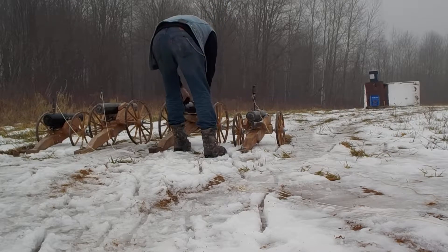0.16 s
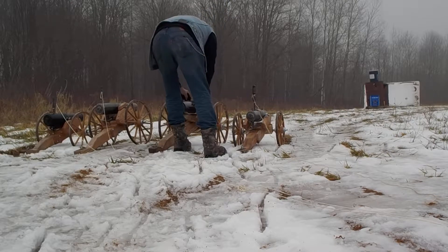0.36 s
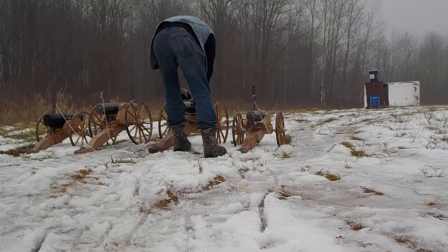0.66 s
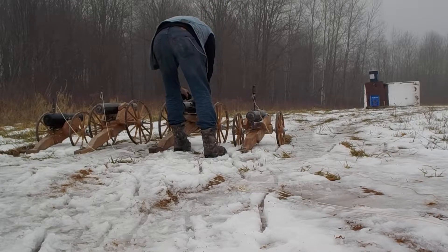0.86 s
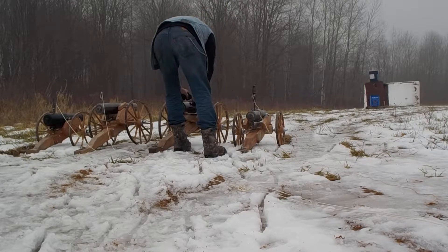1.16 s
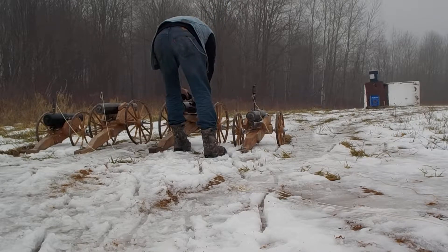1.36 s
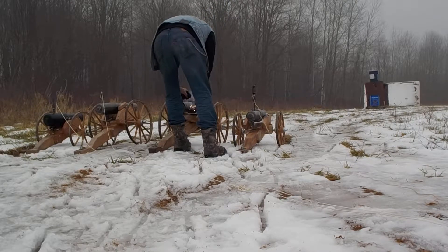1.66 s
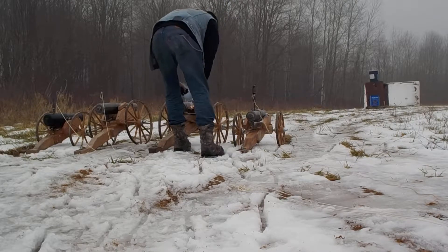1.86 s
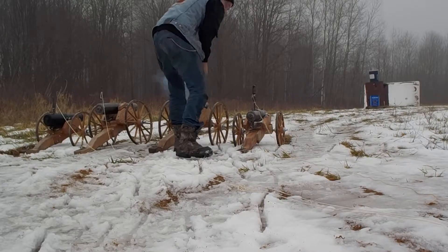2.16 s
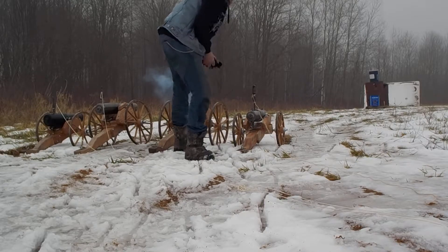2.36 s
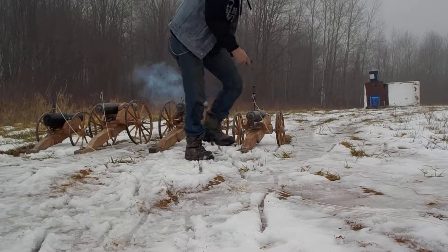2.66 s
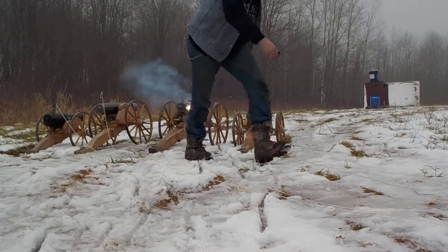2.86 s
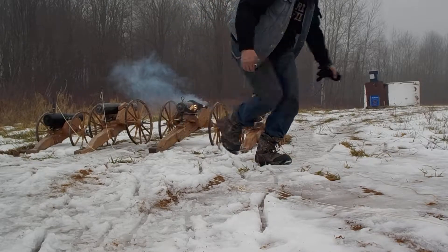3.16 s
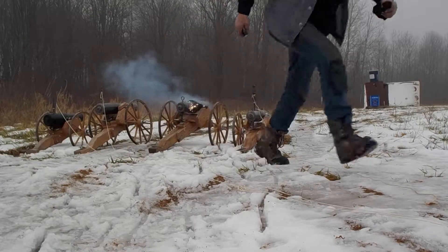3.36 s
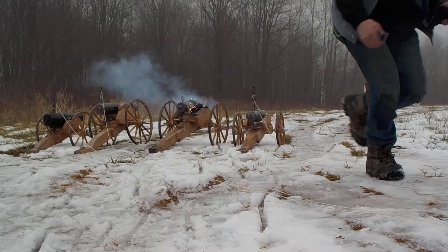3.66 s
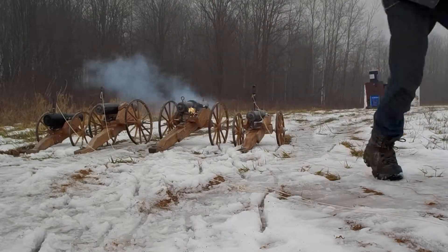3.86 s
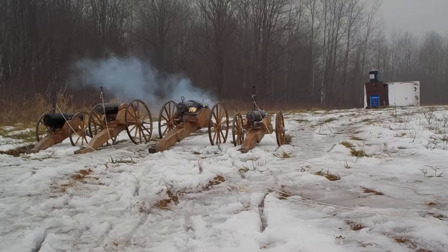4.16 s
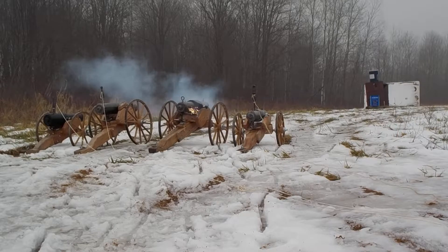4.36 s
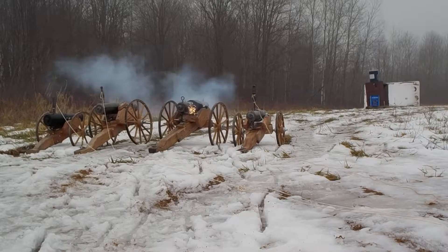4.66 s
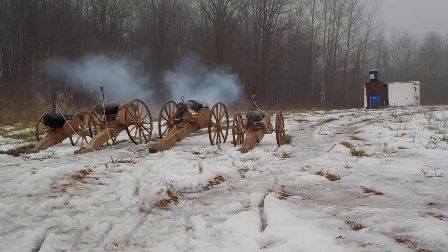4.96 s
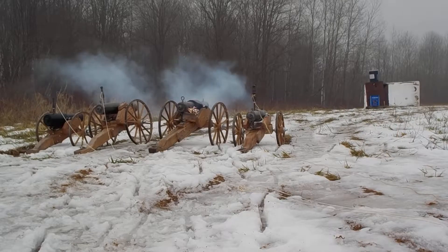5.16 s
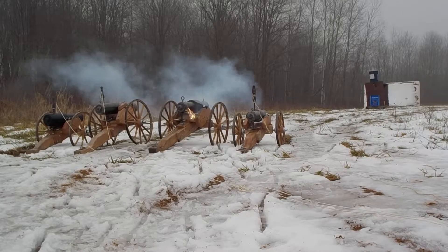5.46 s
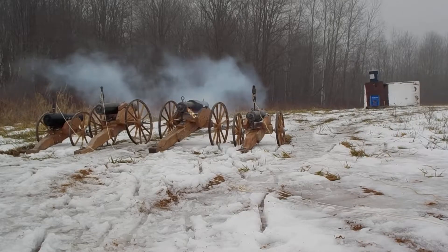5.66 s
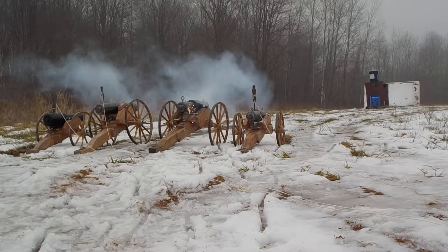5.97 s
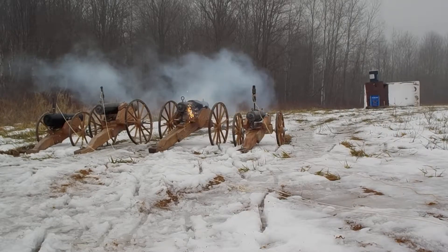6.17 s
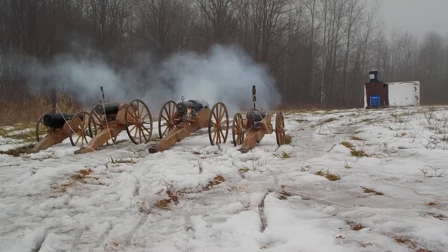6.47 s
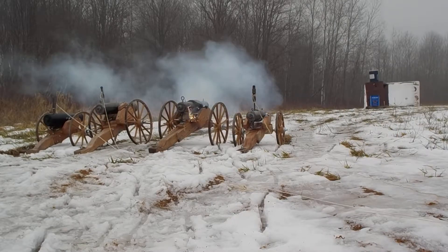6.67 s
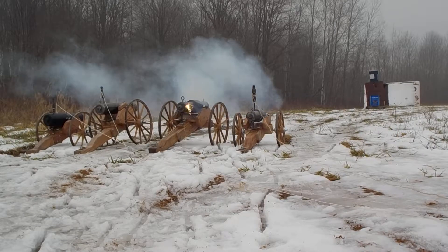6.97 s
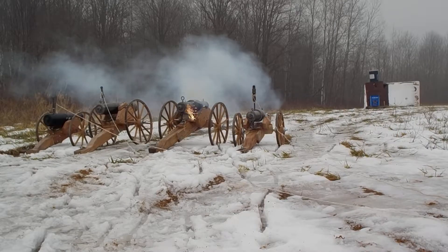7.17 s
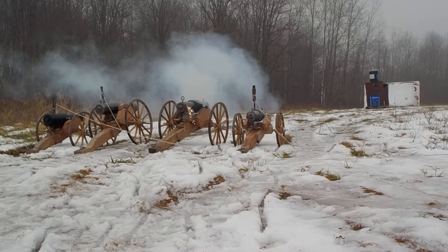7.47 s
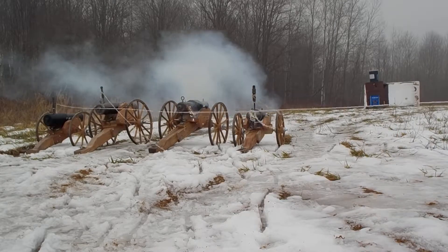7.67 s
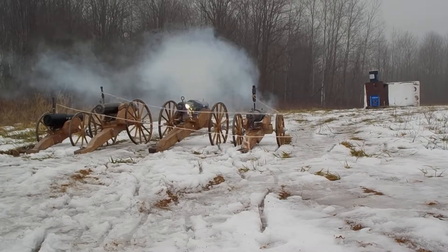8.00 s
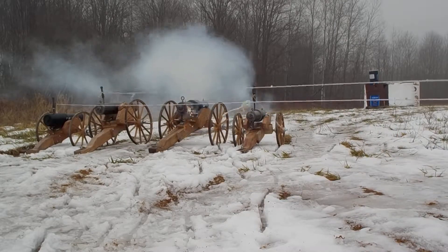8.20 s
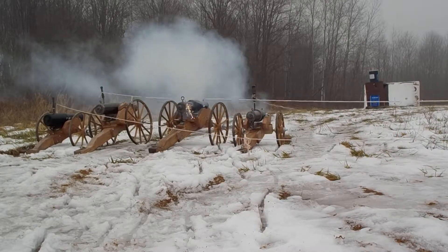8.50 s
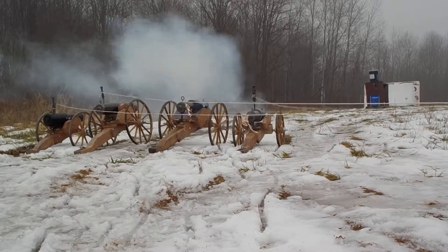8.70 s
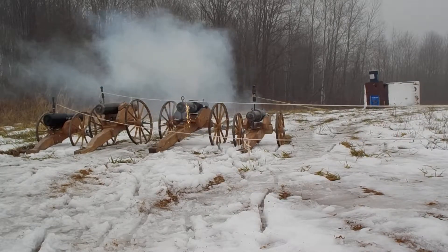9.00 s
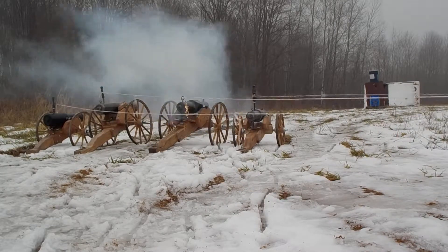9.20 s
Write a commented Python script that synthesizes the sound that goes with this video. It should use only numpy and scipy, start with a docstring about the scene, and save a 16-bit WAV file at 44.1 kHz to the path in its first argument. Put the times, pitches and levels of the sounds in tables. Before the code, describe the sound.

In an open snowy field, a faint distant dog yelps over soft camera hiss. Around two seconds a cannon fuse catches, spitting and crackling with sharp dry pops. Boots crunch quickly through icy crust, nearer and to the right, while the fuse keeps hissing, flaring and snapping irregularly until the end. A small camera hears it with a slightly hollow, filtered tone; no blast follows.

```python
"""Lit fuse in a snowy field

A fuse hisses, spits and pops among small wooden gun carriages: shaped noise for the gas jet, ringing
pressure spikes with bounces and diffuse echoes for the pops. Boots crunch through the crust on the right
as noise grains and short tones, and a dog yelps far off in arched harmonics. A small camera hears it over
steady hiss through a housing that cuts notches in the sound, with a faint tick of pulses inside it."""
import sys
import numpy as np
from scipy import signal
from scipy.fft import rfft, irfft, next_fast_len
from scipy.io import wavfile
from scipy.ndimage import uniform_filter1d

SR = 44100
rng = np.random.default_rng(int(sys.argv[2]) if len(sys.argv) > 2 else 0)


def generate_wav(sig):
    """Save sig (samples, or channels by samples) to the path in sys.argv[1] as 16-bit PCM at SR."""
    pcm = np.round(np.clip(np.atleast_2d(sig).T, -1, 1) * 32767).astype(np.int16)
    wavfile.write(sys.argv[1], SR, pcm)


N = 411894  # length [samples]


def gain_of(db):
    """Level law: amplitude ratio = 10^(dB / 20)."""
    return 10 ** (np.asarray(db) / 20)


def evened(x):
    """Power normalisation: scales to rms 1 over all channels together."""
    return x / np.sqrt(np.mean(x ** 2) + 1e-20)


def read(points, hz):
    """Logarithmic frequency scale: interpolates (frequency [Hz], value) rows along it."""
    f, value = np.transpose(points)
    return np.interp(np.log(hz + 1), np.log(f + 1), value)


def along(curve):
    """Amplitude envelope: gain at every sample from (time [s], level [dB]), -120 dB before the first row."""
    s, db = np.transpose(curve)
    return gain_of(np.interp(np.arange(N) / SR, s, db, left=-120))


def add(mix, s, sound):
    """Superposition: adds a sound at time s, cut at the end of the mix."""
    part = mix[:, round(s * SR):][:, :sound.shape[1]]
    part += sound[:, :part.shape[1]]


def ring(x, hz, width):
    """Resonance: a second-order band-pass with gain 1 at its centre."""
    return signal.lfilter(*signal.iirpeak(hz, hz / width, SR), x)


def coloured(x, spectrum):
    """Spectral shaping: multiplies the spectrum by a level curve, then sets rms 1."""
    size = next_fast_len(N)
    gain = gain_of(read(spectrum, np.fft.rfftfreq(size, 1 / SR)))
    return evened(irfft(rfft(x, size) * gain, size)[..., :N])


def grainy(per_s, spread_db, grain_s, wide):
    """Shot noise: random decaying grains over a steady bed of noise that differs partly between the ports."""
    size = gain_of(spread_db * np.minimum(rng.exponential(1, N), 4))  # uneven if spread_db is not 0
    strikes = size * (rng.random(N) < per_s / SR)
    lumps = signal.lfilter([1], [1, -np.exp(-1 / (grain_s * SR))], strikes)
    both, left, right = rng.standard_normal((3, N))
    return (1 + lumps) * (both + wide * np.array([left, right]))


def lagged(x, samples):
    """Interaural-style time difference: delays the left port by whole samples."""
    return np.array([np.roll(x[0], int(round(samples)), axis=-1), x[1]])


def swells(rows):
    """Exponential growth and decay: millisecond-grid gains of (start, hold, dB, rise, fall) rows.

    Rise and fall are times for 20 dB; only their magnitudes count."""
    s, hold, db, rise, fall = np.transpose(rows)[:5, :, None]
    dt = np.arange(0, N / SR + .001, .001) - s
    before, after = -dt / abs(rise), (dt - hold) / abs(fall)
    return gain_of(db - 20 * np.maximum(np.maximum(before, after), 0))


def at_samples(slow):
    """Linear interpolation: from the millisecond grid to samples."""
    return np.interp(np.arange(N) / SR, np.arange(len(slow)) * .001, slow)


# spectrum of air and sensor hiss: (frequency [Hz], level [dB])
FIELD_SPECTRUM = [(30, -4.5), (60, -22.5), (100, -25), (250, -17.5), (500, -7.5), (1000, -1), (1700, -1),
                  (2200, -13), (3000, -22), (4500, -13.5), (7000, -22.5), (10000, -18), (13000, -16),
                  (15600, -16), (15900, -46)]
# left-right correlation of the hiss: (frequency [Hz], likeness [1])
FIELD_LIKENESS = [(60, 0.3), (240, 0.081), (950, 0.825), (3770, 0.704), (15000, 0.32)]
FIELD_DB = -66  # rms


def field():
    """Stationary random noise: complex Gaussian short-time spectra, partly coherent, with faint patches."""
    frames, hz = N // 256 + 5, np.fft.rfftfreq(1024, 1 / SR)
    a, b, c, d, patches = rng.standard_normal((frames, 513, 5)).T
    patches = uniform_filter1d(patches, 12, 0)  # smooth over frequency
    patches = evened(uniform_filter1d(patches, 14, 1))  # and over time
    same = np.clip(read(FIELD_LIKENESS, hz), -1, 1)[:, None]
    left = a + 1j * b
    right = same * left + np.sqrt(1 - same ** 2) * (c + 1j * d)
    level_db = read(FIELD_SPECTRUM, hz)[:, None] + 0.97 * patches
    hiss = signal.istft(np.array([left, right]) * gain_of(level_db), nperseg=1024, noverlap=768)[1]
    return gain_of(FIELD_DB) * evened(hiss[:, :N])


TICK_FIRST_S, TICK_EVERY_S, TICK_WIDE_S = .01545, .0170369, .00011
# peak of the tick, left row and right row: (level [dB])
TICK_PEAKS = [
    [-54.5],
    [-57.5],
]


def ticks():
    """Band-limited impulses: each tick inside the camera is a short pulse heard as two opposite edges."""
    starts = np.arange(TICK_FIRST_S, N / SR - .01, TICK_EVERY_S) * SR
    near = np.round(starts).astype(int)[:, None] + np.arange(-120, 126)
    after = near - starts[:, None]  # samples since the exact start
    soft = 2 * 15600 / SR  # edges limited to 15600 Hz
    edges = np.sinc(soft * after) - 1.27 * np.sinc(soft * (after - TICK_WIDE_S * SR))
    out = np.zeros(N)
    out[near] = edges * np.hanning(near.shape[1])
    out = signal.lfilter([1, -.7], [1], out)  # coupled in with a treble lift
    return gain_of(TICK_PEAKS) * out / out.max()


# far yelps: (time [s], length [s], top of the second harmonic [Hz], level [dB])
YELP_EVENTS = [(0.586, .088, 1090, -66.5), (0.879, 0.106, 1085, -65), (1.163, .112, 1080, -65),
               (1.47, .07, 1150, -72)]
YELP_SAG, YELP_TOP_AT = .17, .52  # pitch arch: share lost at the start, place of the top (0 to 1)
YELP_FADE_DB = -1.5  # over a yelp


def dog():
    """Harmonic series: arched yelps, of which distance leaves the second harmonic and some of the third."""
    out = np.zeros((2, N))
    for s, length, top_hz, db in YELP_EVENTS:
        u = np.arange(0, length, 1 / SR) / length
        arch = 1 - YELP_SAG * ((u - YELP_TOP_AT) / YELP_TOP_AT) ** 2
        phase = np.pi * np.cumsum(top_hz * arch) / SR  # of the fundamental, half the table's pitch
        voice = np.sin(2 * phase) + gain_of(-7.0) * np.sin(3 * phase)
        envelope = gain_of(db + YELP_FADE_DB * u) * signal.windows.tukey(len(u), .4)
        add(out, s, np.sqrt(2) * envelope * voice[None])
    return out


# spectrum of breaking crust: (frequency [Hz], level [dB])
SNOW_SPECTRUM = [(120, -22), (300, -9), (600, -2), (1000, -9.5), (1800, 1.5), (2800, -10), (4200, -12),
                 (7000, -9.5), (10000, -36.5)]
# crust giving way under a boot:
# (time [s], hold [s], level [dB], time to fall 20 dB, sign ignored [s], pitch of the hollow under the sole [Hz])
CRUNCH_EVENTS = [(2.858, 0.22, -60.5, -0.44, 936), (3.401, 0.055, -63.5, -0.06, 940),
                 (3.476, 0.024, -53.5, .13, 943), (3.679, 0.164, -67.5, 0.55, 910),
                 (3.947, 0.0448, -42, 0.0619, 1202), (4.085, 0.034, -61, -0.08, 1180),
                 (4.196, 0.0326, -53.5, -0.02, 1170), (4.318, .004, -39, .012, 1000),
                 (4.363, 0.0767, -41.5, 0.07, 1080), (4.871, .047, -41, 0.0281, 1005),
                 (4.94, 0.0457, -44, 0.0015, 830), (5.01, 0.0425, -55.5, 0.07, 905),
                 (5.113, 0.042, -62, -0.06, 1143), (5.242, 0.0059, -54, 0.0845, 1300),
                 (5.287, 0.0496, -41, -0.0012, 1120), (5.37, 0.0204, -40.5, -0.01, 804),
                 (5.43, 0.033, -62, 0.22, 906), (5.63, 0.0396, -44.5, 0.0635, 958),
                 (5.782, 0.0109, -46.5, -0.03, 1226), (5.81, 0.02395, -42, -0.01, 1163),
                 (5.888, 0.0194, -57.5, 0.15, 950), (6.136, 0.0209, -40, 0.0754, 1332),
                 (6.184, 0.082, -54.5, 0.143, 1334), (6.624, 0.018, -53, 0.18, 810),
                 (7.067, 0.186, -63, 0.37, 930), (7.292, 0.041, -54.5, .11, 867),
                 (7.48, 0.058, -54, 0.06, 894), (7.565, 0.0457, -49.5, 0.06, 1025),
                 (7.681, 0.069, -61, 0.42, 717), (7.758, 0.119, -55.5, 0.31, 766),
                 (8.149, 0.0188, -47, 0.0228, 939), (8.404, .045, -48, .018, 900),
                 (9.108, .05, -67.5, 4.15, 1022)]
CRUNCH_RISE_S = .014  # the crust breaks suddenly: time to rise 20 dB
RIGHT_LAG = 2  # samples by which the left port lags for sound from the right


def boots():
    """Moving resonance: dense grains of breaking crust ring the hollow under the sole, off to the right."""
    crust = coloured(grainy(per_s=450, spread_db=4.0, grain_s=.0012, wide=.1), SNOW_SPECTRUM)
    rows = [(s, hold, db, CRUNCH_RISE_S, fall) for s, hold, db, fall, _ in CRUNCH_EVENTS]
    power = swells(rows) ** 2 + 1e-30
    total = power.sum(axis=0)
    hz = at_samples(np.array(CRUNCH_EVENTS)[:, -1] @ power / total)  # pitch averaged by power
    # shift the pitch to 0 Hz, low-pass to a resonance 300 Hz wide, shift back
    turn, keep = np.exp(2j * np.pi * np.cumsum(hz) / SR), np.exp(-np.pi * 300 / SR)
    hollow = 2 * (turn * signal.lfilter([1 - keep], [1, -keep], crust / turn)).real
    crunch = evened(crust + gain_of(10.5) * hollow)
    return lagged(at_samples(np.sqrt(total)) * crunch, RIGHT_LAG)


# lumps of crust snapping under a boot: (time [s], level before the pulse shape [dB], pitch [Hz])
CLOD_EVENTS = [(3.968, -33, 1410), (4.099, -41.5, 1314), (4.135, -43.5, 1358), (4.377, -42, 1340),
               (4.427, -30.5, 1572), (4.873, -35.5, 576), (4.887, -30, 1404), (4.946, -25.5, 843),
               (4.958, -40, 586), (4.981, -34.5, 747), (5.015, -41, 594), (5.293, -42, 1264),
               (5.325, -27, 1600), (5.373, -30.5, 710), (5.644, -40, 591), (5.783, -35.5, 1686),
               (5.82, -33.5, 995), (6.619, -40.5, 710), (7.488, -45.5, 815), (7.583, -39.5, 910),
               (7.827, -44, 573), (7.868, -34, 600)]


def clods():
    """Damped oscillation: each snapping lump gives a few soft cycles, off to the right."""
    t, out = np.arange(500) / SR, np.zeros((2, N))
    swell = t / 0.00222 * np.exp(1 - t / 0.001452)
    for s, db, hz in CLOD_EVENTS:
        add(out, s, gain_of(db) * swell * np.sin(2 * np.pi * hz * t) * np.ones((2, 1)))
    return lagged(out, RIGHT_LAG)


# steady jet of the fuse: (time [s], level [dB])
BURN_LEVEL = [(1.465, -96), (1.48, -69.5), (1.65, -71.5), (1.67, -67.5), (1.94, -68.5), (2.3, -66.5),
              (2.6, -64.5), (2.85, -62), (3.3, -63), (3.62, -62.5), (3.8, -57.5), (4.6, -57), (4.9, -59),
              (5.2, -59), (6.0, -59), (6.42, -66), (6.75, -56.5), (6.99, -69.5), (7.05, -59), (7.8, -61),
              (8.4, -58), (8.6, -59.5), (9.339, -58.5)]
# spectrum of the jet: (frequency [Hz], level [dB])
JET_SPECTRUM = [(200, -20), (500, -7.5), (900, -8.5), (1600, -8), (3000, -2), (4000, -2.5), (5200, -9),
                (6500, -1.5), (9000, -14), (12000, -30.5), (16000, -45.5)]
# flares of the jet: (time [s], hold [s], level [dB], time to rise 20 dB [s], time to fall 20 dB [s]), signs of
# the last two ignored
FLARE_EVENTS = [(1.95, 0.0136, -51, 0.0215, 0.18), (2.31, 0.038, -60, 0.12, 0.56),
                (3.14, 0.046, -55, 0.32, 0.65), (3.535, 0.0144, -50, 0.0973, -0.0028),
                (3.92, 0.046, -53, 0.45, -0.16), (4.07, 0.01365, -52, -0.1, 0.05),
                (4.27, 0.0874, -53.5, 0.05, 0.35), (4.36, 0.066, -52.5, -0.21, 0.31),
                (4.655, 0.0346, -46.5, 0.06, -0.0047), (5.315, 0.028, -46.5, 0.0737, 0.0225),
                (5.39, 0.044, -56.5, 0.99, 0.06), (5.65, 0.079, -59.5, 0.02, 0.42),
                (6.13, 0.061, -47.5, 0.0336, -0.0226), (6.29, 0.049, -58, 0.31, 0.1746),
                (7.165, 0.0214, -43.5, 0.0469, 0.0588), (7.39, 0.0313, -56, 0.06, 0.31),
                (7.853, 0.012, -54.5, 0.01, 0.17), (8.953, 0.00924, -48.5, 0.0327, 0.11)]
# the jet puffs after a pop, a little more after a loud one: level at a 0 dB pop, then dB per dB
PUFF_DB, PUFF_FOLLOWS = -55, 0.313
PUFF_LATE_S, PUFF_RISE_S, PUFF_FALL_S = 0.0209, 0.0188, 0.0577  # rise and fall over 20 dB
CATCH_S, CATCH_TOP_HZ = 1.5, 4700  # the jet is dull above this pitch until the powder catches fully
BAND_DRIFT_DB, BAND_DRIFT_S, BAND_WIDE_HZ = 2.5, .12, 900  # the bands of the jet wander


def fuse():
    """Jet noise: a gas jet of broadband noise and tiny spits, which flares and puffs after each pop."""
    puffs = [(s + PUFF_LATE_S, 0, PUFF_DB + PUFF_FOLLOWS * db, PUFF_RISE_S, PUFF_FALL_S)
             for s, db, *_ in POP_EVENTS]
    surge = at_samples(np.linalg.norm(swells(FLARE_EVENTS + puffs), axis=0))  # powers add
    jet = coloured(grainy(per_s=120, spread_db=0.0, grain_s=0.00121, wide=0.207), JET_SPECTRUM)
    hz, t, z = signal.stft(jet, SR, nperseg=512)
    drift = rng.standard_normal(z.shape[1:])
    drift = uniform_filter1d(drift, int(BAND_WIDE_HZ / hz[1]), 0)
    drift = evened(uniform_filter1d(drift, int(BAND_DRIFT_S / t[1]), 1))
    dull_db = -14.0 * (hz[:, None] > CATCH_TOP_HZ) * (t < CATCH_S)
    jet = signal.istft(z * gain_of(BAND_DRIFT_DB * drift + dull_db), SR, nperseg=512)[1][:, :N]
    return np.hypot(along(BURN_LEVEL), surge) * jet


# pops: (time [s], crack level before a common lift [dB], thump relative to it [dB],
#        top edge relative to it [dB], change of the fizz after the spike [dB])
POP_EVENTS = [(1.8964, -54, 2, -23, 0), (1.946, -29, -4.5, -18.5, -2), (1.9901, -14.5, -4, -18.5, 0),
              (2.1205, -25.5, 1, -22.5, 0), (2.2237, -34.5, -5.5, -12.5, 5.5),
              (2.2769, -38.5, -2, -13.5, 6), (2.3097, -36, -4.5, -14, 4), (2.377, -19.5, -2.5, -15.5, 4.5),
              (2.5289, -20.5, -3, -42.5, -1), (2.615, -49, -5.5, -25, 0), (2.8266, -27.5, -5.5, -35.5, -6),
              (2.8316, -24.5, -4, -34.5, -4), (2.8652, -23.5, -8, -16.5, -4),
              (2.8752, -13.5, -5.5, -19.5, 3), (2.8835, -31.5, 0.5, -28.5, -2),
              (2.8987, -20.5, -2.5, -19, -2), (2.9153, -13.5, -7, -2, 6), (3.006, -33, -2, -32, -12),
              (3.1618, -12.5, -7, -9.5, 2), (3.47, -9.5, -7, -1.5, -7), (3.7961, -11.5, -6.5, -4.5, 5),
              (3.908, -25.5, -3.5, -24, -9), (4.003, -10, -11.5, 0, 6), (4.1933, -12.5, -4.5, -3.5, 1),
              (4.275, -35.5, -29, -33, 5), (4.3186, -29.5, -3, -41.5, 3), (4.351, -35, -8.5, -36, 4),
              (4.4982, -20.5, -7.5, -48.5, -3), (4.6427, -16.5, -9, -37, -2), (4.843, -12.5, -8, -7.5, -1),
              (5.1427, -14.5, -10.5, -13.5, 3), (5.2276, -10.5, -12, -3.5, -5), (5.3425, -25.5, -21, 0, -2),
              (5.3542, -17, -9, -32, 4), (5.4107, -34, -6, -32, 7), (5.9589, -13.5, -8.5, -22, 1),
              (6.0447, -29.5, -6, -29, 2), (6.0705, -19, -9, -33, -6), (6.1576, -29, -23, -25, -4),
              (6.1638, -38.5, -12, -22.5, 7.5), (6.1719, -43, 3, -24, -5), (6.1872, -39, -8.5, -30, 1),
              (6.4879, -43, -16, -14, -5), (6.5172, -24, -7, -26, 8), (6.5434, -20, -12, -25.5, 8),
              (6.548, -26, -21, -21.5, -3), (6.571, -27, -11, -28, 4), (6.5829, -33.5, -11, -18.5, 5),
              (6.6762, -30.5, -8, -26.5, 2), (6.6882, -17.5, -10.5, -38.5, -2),
              (6.8164, -21, -8.5, -31, -1), (6.8915, -34.5, -7, -19.5, 7), (7.001, -31.5, -3, -20, -1.5),
              (7.0622, -13.5, -6.5, -4, 2), (7.0818, -27, -8, -27, -16.5), (7.1679, -36.5, -2, -23, 6),
              (7.1921, -39, -0.5, -25.5, 0), (7.3185, -19.5, -6, -27.5, -6), (7.5547, -14, -6, -11, 8),
              (7.853, -35.5, -8, -23.5, 7), (7.9172, -17, -5.5, -45.5, 3), (7.9438, -30.5, -14.5, -32.5, 0),
              (8.0396, -26, -9, -24, 6), (8.1537, -22, -8.5, -28, 4), (8.1773, -13.5, -7.5, -4.5, 5),
              (8.2098, -12, -9, -9.5, 1), (8.3387, -14.5, -6.5, -16.5, 8), (8.6049, -24, -6, -22, 0),
              (8.7772, -41.5, 0, -26.5, 6), (8.8383, -15, -9.5, -36, -3), (8.8775, -18.5, -6.5, -31, 3.5),
              (8.9437, -37, -1, -13.5, 15.5), (8.963, -13, -9.5, -17.5, 2.5), (9.003, -25, 1.5, -27, 0.5)]
# resonances of thump, crack and edge, one list each: (frequency [Hz], width of the first pass [Hz], level [dB])
POP_MODES = [
    [(551.9, 328, 7.5), (975, 775, 10), (1600, 1258, 8)],
    [(4320, 3805, 15), (5711, 1300, 10.5), (6508, 1138, 14.5), (9040, 2140, -1)],
    [(9270, 9230, 4), (13544, 3600, 10)],
]
# upper limits of thump, crack and edge: (frequency [Hz])
POP_LIMITS = [4018, 9485, 15350]
# noisy trail of thump, crack and edge, before each pop's own change: (level [dB])
FIZZ_LEVELS = [-24, -22, -34]
# reflections off ground and carriage: (nominal delay [s], thump [dB], crack [dB], edge [dB])
BOUNCE_PATHS = [(.00027, -5, -7, -7), (.0013, -9, -22, -40), (.0034, -10, -28, -50)]
# diffuse echoes: (delay [s], time to fall 60 dB [s], thump [dB], crack [dB], edge [dB], lag of left port [samples])
SCATTER_PATHS = [(0.0171, 0.0218, -36.5, -41, -69, 2), (.025, 0.126, -55.5, -53.5, -78.5, 2),
                 (.0603, 0.01, -42, -36, -68.5, 0)]
# change of each diffuse echo while someone stands beside the fuse: (level [dB])
STANDING_CHANGE = [
    [7],
    [5],
    [-6],
]
STANDS_UNTIL_S = 2.7
FIZZ_T60_S, FIZZ_S_PER_DB = .005, .0008  # the weaker the pop, the longer it fizzes


def pops():
    """Impulse response: a pressure spike with a fizzing trail, bounced and echoed, rings in three ranges."""
    t, out = np.arange(5000) / SR, np.zeros((2, N))
    delay, t60, *echoes_db, lags = np.transpose(SCATTER_PATHS)[:, :, None]
    late, *bounces_db = np.transpose(BOUNCE_PATHS)
    dying = (t >= delay) * gain_of(-60 * np.maximum(t - delay, 0) / t60)
    for s, crack_db, thump_db, edge_db, fizz_db in POP_EVENTS:
        both, left, right = rng.standard_normal((3, len(SCATTER_PATHS) + 1, len(t)))
        noise = both + 0.13 * np.array([left, right])  # scattered sound differs a little left and right
        fizz_t60 = max(FIZZ_T60_S - FIZZ_S_PER_DB * crack_db, .005)
        fizz = noise[:, -1] * gain_of(fizz_db - 60 * t / fizz_t60)
        near = gain_of(np.multiply(STANDING_CHANGE, s < STANDS_UNTIL_S))
        echoes = [lagged(near[k] * dying[k] * noise[:, k], lag[0]) for k, lag in enumerate(lags)]
        echoes = np.stack(echoes, axis=1)
        at = np.round(late * rng.uniform(.85, 1.3, len(late)) * SR).astype(int)  # each pop sits elsewhere
        aside = rng.uniform(-0.536, 0.304) * np.array([[1], [-1]])  # part of a sample between the ports
        for k, db in enumerate((thump_db, 0., edge_db)):
            spike = 1. * (t == 0)
            spike[at] = gain_of(bounces_db[k])
            echoed = (gain_of(echoes_db[k]) * echoes).sum(axis=1)
            shock = spike + gain_of(FIZZ_LEVELS[k]) * fizz + echoed
            rung = sum(gain_of(mode_db) * ring(ring(shock, hz, width), hz, 1.264 * width)
                       for hz, width, mode_db in POP_MODES[k])
            rung = signal.sosfilt(signal.butter(5, POP_LIMITS[k], fs=SR, output="sos"), rung)
            rung = rung + aside * np.gradient(rung, axis=1)  # a slope term shifts by under a sample
            add(out, s + 0.000997, gain_of(crack_db + db + 4.5) * rung / abs(rung).max())
    return out


def scene():
    """Linear superposition: the pressures of all sources add."""
    return field() + ticks() + dog() + boots() + clods() + fuse() + pops()


# centres of the housing notches: (frequency [Hz])
NOTCH_CENTRES = [2420, 3020, 8030]
# the notches at those centres, in order: (width [Hz], level left at the centre [dB])
NOTCHES = [(1026, -61.5), (274, -9), (1175, -52)]
EDGE_HZ = 17100  # band limit


def record(dry):
    """Linear filtering: bass cut of the capsule, notches of the housing, then the band limit."""
    out = signal.sosfilt(signal.butter(2, 150, "high", fs=SR, output="sos"), dry)
    for hz, (width, db) in zip(NOTCH_CENTRES, NOTCHES):
        out = out - (1 - gain_of(min(db, 0))) * ring(out, hz, width)
    limit = signal.firwin(511, EDGE_HZ, window=("kaiser", 9), fs=SR)
    return signal.oaconvolve(out, limit[None], "same")


dry = scene()
out = record(dry)
generate_wav(out)
```